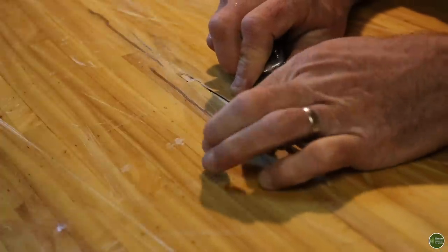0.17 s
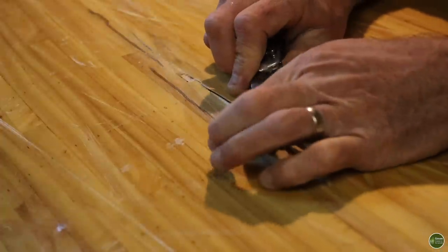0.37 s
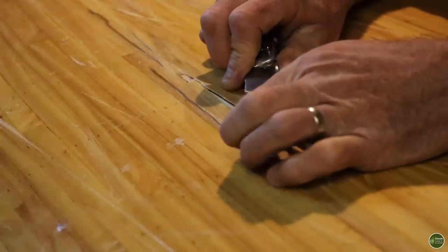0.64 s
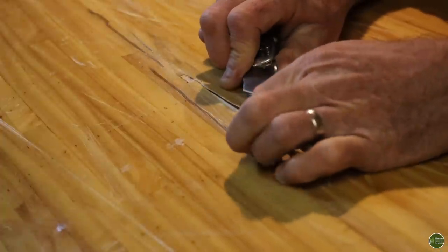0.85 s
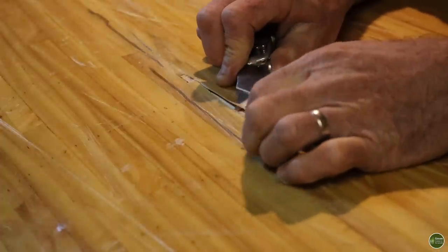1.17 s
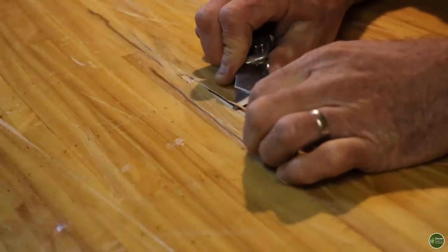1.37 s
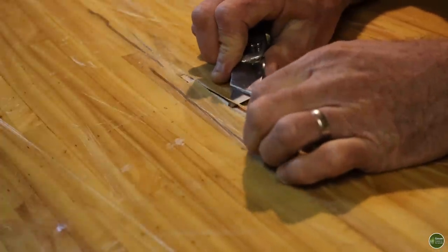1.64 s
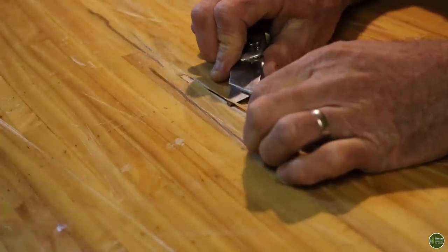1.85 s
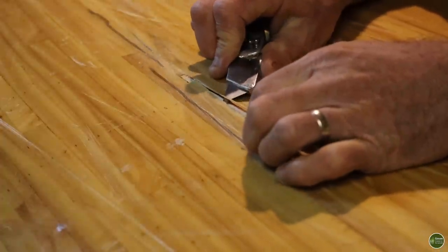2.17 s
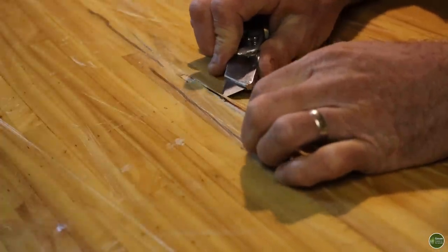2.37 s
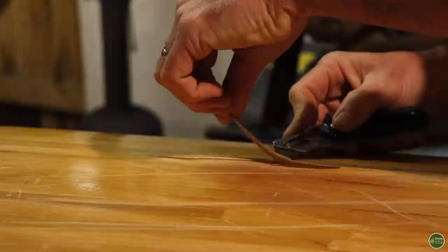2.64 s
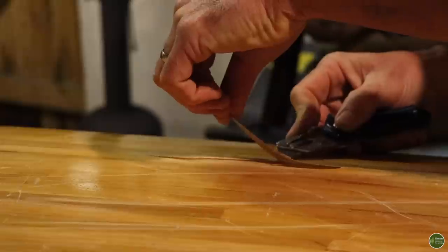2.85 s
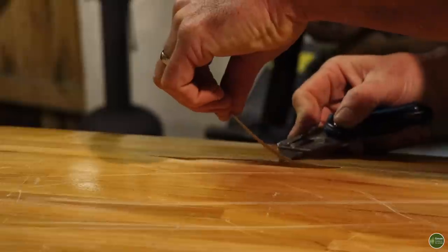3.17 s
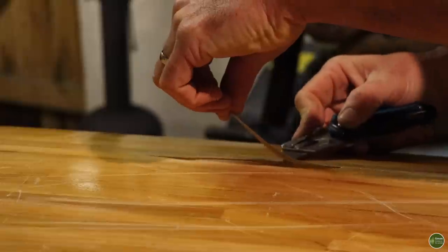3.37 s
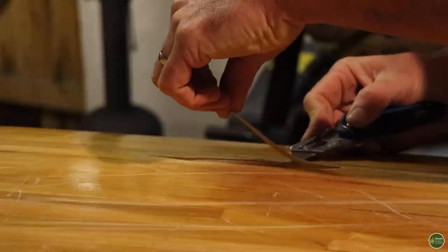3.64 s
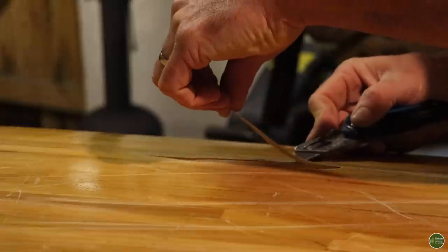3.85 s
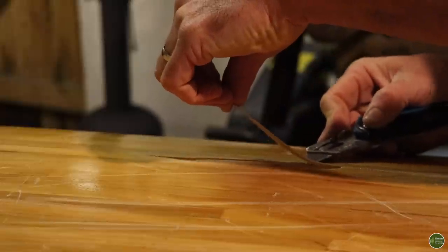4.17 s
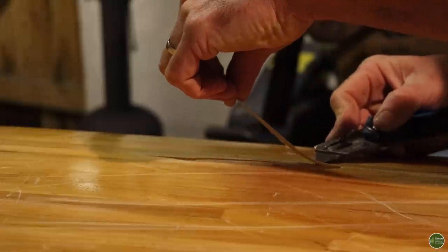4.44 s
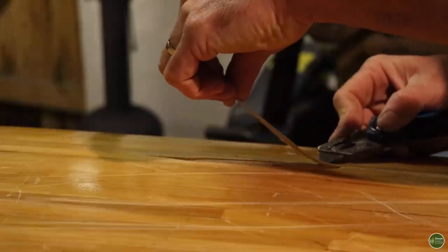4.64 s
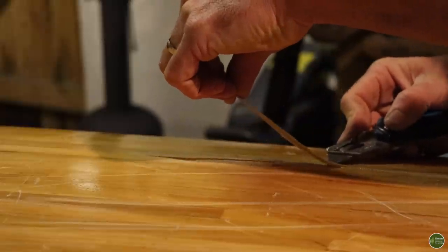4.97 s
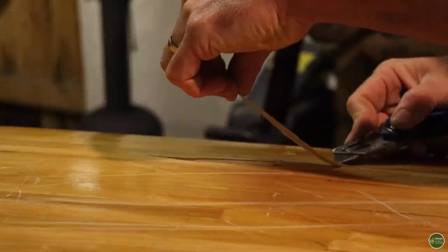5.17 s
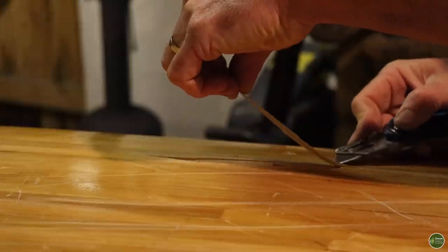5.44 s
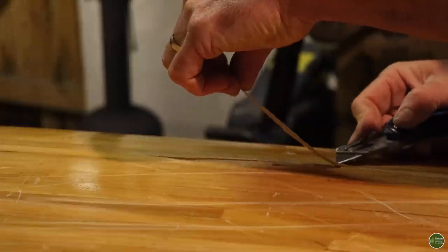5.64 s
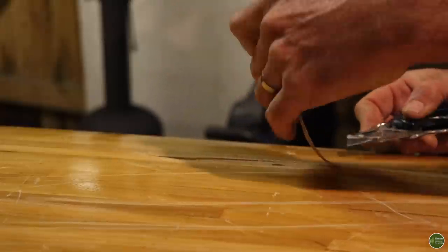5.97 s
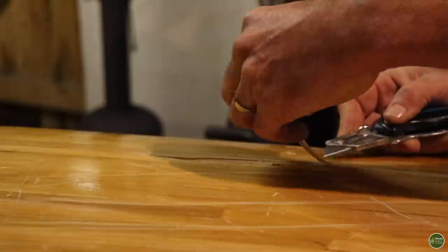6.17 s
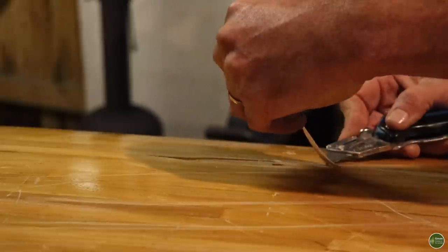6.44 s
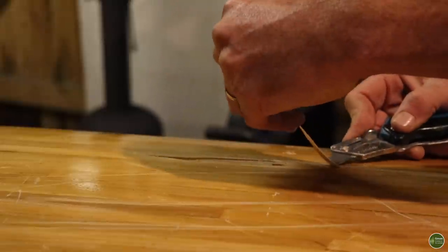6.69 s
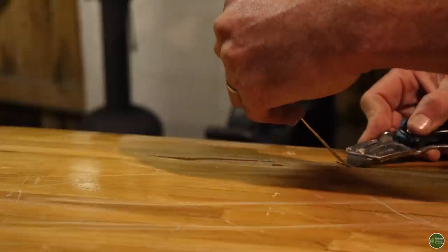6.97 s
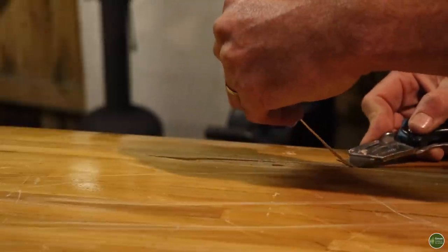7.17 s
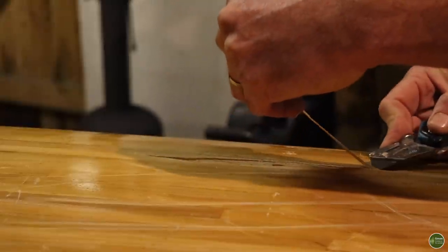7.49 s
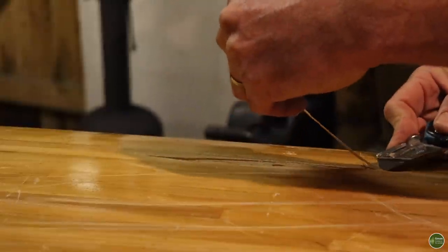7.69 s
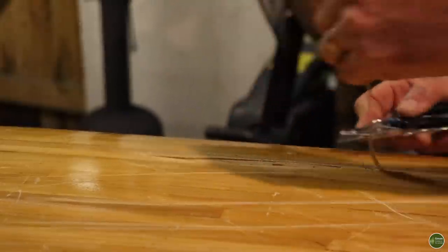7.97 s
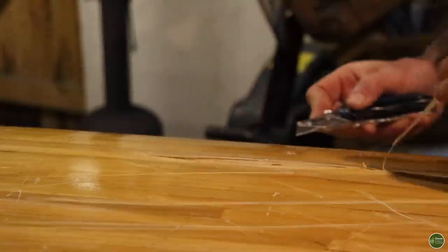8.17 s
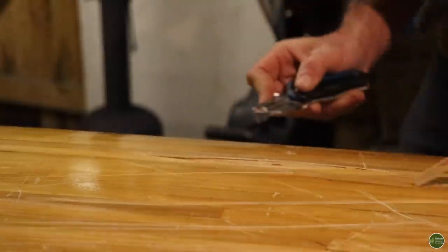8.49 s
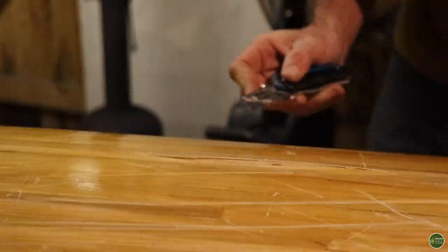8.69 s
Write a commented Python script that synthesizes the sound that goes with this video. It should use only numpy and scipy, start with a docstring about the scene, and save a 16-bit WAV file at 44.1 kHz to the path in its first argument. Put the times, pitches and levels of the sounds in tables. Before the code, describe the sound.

Brittle fibreglass being pried from wood: gritty pushes of a blade, dry clicks, and millisecond-sharp snaps with woody knocks and a short hollow boom. The first part is brighter; after an abrupt change of perspective it is darker and boomier. Pauses are quiet with low garage rumble and slight hiss. Toward the end the snaps become brighter and more frequent, finishing with scrapes and a soft slide. Close microphone, short room reverberation.

```python
"""In a garage, a utility knife pries brittle fibreglass off a wooden hull. Each snap is a millisecond-scale
fracture that rings the strip and blade, knocks on the planking and makes the hollow hull boom. Between snaps
the blade scrapes and the bond tears in dense crackle, made of random grains over friction noise. Now and then a
sleeve or hand brushes softly past, above a low rumble and faint hiss. Part-way through, the sound cuts to a
second listening position."""
import sys
import numpy as np
from scipy import signal
from scipy.fft import rfft, irfft
from scipy.io import wavfile
from scipy.ndimage import uniform_filter1d

SR = 44100
rng = np.random.default_rng(int(sys.argv[2]) if len(sys.argv) > 2 else 0)


def wav_out(sig):
    """Save sig, one row per channel (or a flat mono array), as 16-bit PCM at SR to the path in sys.argv[1]."""
    wavfile.write(sys.argv[1], SR, np.round(np.clip(np.atleast_2d(sig).T, -1, 1) * 32767).astype(np.int16))


N = 388962
TIME = np.arange(N) / SR
IR_SIZE = 32768  # samples in which responses are built
CUT_S = 2.68  # the second listening position takes over
SNAP_SAMPLES = 0.04 * SR  # snap levels are taken over 40 ms


def undb(db):
    """Decibels to gain."""
    return 10 ** (np.asarray(db) / 20)


def unit(x):
    """Scale to an energy of one."""
    return x / np.sqrt(np.sum(x ** 2) + 1e-18)


def rms_one(x):
    """Scale a signal of full length to an rms of one."""
    return unit(x) * np.sqrt(N)


def on_log(hz, points):
    """Read (frequency [Hz], value) points along a log-frequency axis."""
    f, value = np.transpose(points)
    return np.interp(np.log(np.maximum(hz, 1)), np.log(f), value)


def causal(db):
    """Minimum-phase impulse response of a gain curve, by folding its cepstrum."""
    cepstrum = irfft(np.log(undb(db)))
    half = len(cepstrum) // 2
    cepstrum[1:half] *= 2
    cepstrum[half + 1:] = 0
    return irfft(np.exp(rfft(cepstrum)))


def band(x, lo, hi, order=3):
    """Butterworth band-pass between two frequencies in Hz."""
    sos = signal.butter(order, [lo, min(hi, 0.49 * SR)], "band", fs=SR, output="sos")
    return signal.sosfilt(sos, x)


def bumps(hz, modes):
    """Gain in dB of (frequency [Hz], width [Hz], peak [dB]) resonances."""
    return sum(db / (1 + (2 * (hz - f) / width) ** 2) for f, width, db in modes)


def resonate(x, modes, size=2048):
    """Pass a signal through resonances, keeping its length."""
    response = causal(bumps(np.fft.rfftfreq(size, 1 / SR), modes))
    return signal.oaconvolve(x, response)[:len(x)]


def even_out(spectrum, bins):
    """Flatten a spectrum in the large, leaving its fine colour."""
    return spectrum / np.sqrt(uniform_filter1d(abs(spectrum) ** 2, size=bins))


def flutter(size=600):
    """Random unsteadiness over about a hundredth of a second, spread one."""
    smooth = uniform_filter1d(rng.standard_normal(N), size)
    return rms_one(uniform_filter1d(smooth, size // 2))


# spectrum of the garage background: (frequency [Hz], relative density [dB per Hz])
AIR_SPECTRUM = [(15, -25.5), (25, -5.5), (76, -13.5), (229, -17), (335, -26.5), (405, -14.5), (607, -53.5),
                (796, -20.5), (1020, -33), (2610, -37.5), (16000, -45)]
AIR_A_DB, AIR_B_DB = -50.5, -54  # rms level at the first and the second position


def air():
    """Low rumble and faint hiss of the garage: shaped noise, with its level set by the position."""
    gain = undb(on_log(np.fft.rfftfreq(N, 1 / SR), AIR_SPECTRUM))
    noise = irfft(rfft(rng.standard_normal(N)) * gain, N)
    return rms_one(noise) * undb(np.where(TIME < CUT_S, AIR_A_DB, AIR_B_DB))


# ring time of the garage and hull: (frequency [Hz], time to fall by 60 dB [s])
RING_TIMES = [(60, 0.92), (250, 0.22), (1000, 0.25), (3300, 0.26), (7000, 0.19), (14000, 0.12)]


def diffuse(build_s):
    """Dense reflections that build up, then die at a rate that depends on frequency."""
    t, hz = TIME[:IR_SIZE], np.fft.rfftfreq(IR_SIZE, 1 / SR)
    noise, tail = rfft(rng.standard_normal(IR_SIZE)), 0
    build = 1 - np.exp(-t / build_s)
    for (_, t60), pick in zip(RING_TIMES, np.eye(len(RING_TIMES))):
        # each ring time owns the region around its frequency and crossfades into its neighbours
        share = on_log(hz, [(f, p) for (f, _), p in zip(RING_TIMES, pick)])
        tail = tail + irfft(noise * share) * undb(-60 * t / t60)
    # the reflections favour no broad region of pitch
    spectrum = even_out(rfft(tail * build), 45)
    return unit(irfft(spectrum) * build * (t < t[-1] * 0.5))


# modes of the hollow hull: (frequency [Hz], level at first position [dB], level at second position [dB])
HOLLOW_MODES = [(52.5, -9, 2.5), (73.8, -7.5, -2), (111.4, -4, 1.5), (140.16, -0.5, 2.5), (163.8, 4, -29.5),
                (195.7, 0, -14.5), (226.1, 0, -1), (241.5, -3.5, -0.5), (285.4, -0.5, -5),
                (310.6, -5, -9.5), (324.3, -9, -9.5), (355.3, -3, -10), (367, -4.5, -11.5), (411, -4, -18),
                (445.4, -6, -5)]
HULL_T60_S = 0.38


def hull_ring(position, build_s=0.0062):
    """The hull's modes swell as the blow spreads through it, then die away."""
    t, modes = TIME[:IR_SIZE], 0
    for row in HOLLOW_MODES:
        phase = rng.random()
        modes = modes + undb(row[1 + position]) * np.sin(2 * np.pi * (row[0] * t + phase))
    return unit(modes * undb(-60 * t / HULL_T60_S) * (1 - np.exp(-t / build_s)))


# colour of strip, blade and planking at the first and second position: (frequency [Hz], relative gain [dB])
COLOUR_FIRST = [(240, -35.5), (400, 4.5), (1010, -2), (1400, 2), (2050, -3.5), (3370, 0.5), (4950, -7.5),
                (7060, -9.5), (8900, -12.5), (10200, -12), (11400, -15), (12300, -16.5), (13300, -21),
                (14800, -17.5), (16000, -33.5)]
COLOUR_SECOND = [(240, -35), (400, 6.5), (453, 2.5), (504, -6), (645, -2.5), (742, -4), (852, -4),
                 (1160, -6.5), (1900, -9.5), (3310, 0), (4110, -7.5), (5430, -13.5), (7400, -18.5),
                 (12100, -26.5), (16000, -30.5)]
# broad response of the hull at the first and second position: (frequency [Hz], relative gain [dB])
HULL_FIRST = [(35, -22), (70, 4.5), (150, 0.5), (300, 4.5), (500, -1)]
HULL_SECOND = [(28, -6.5), (55, 4.5), (90, -10.5), (140, 0.5), (300, -5.5), (500, -6)]
# resonances of planking, strip and blade: (frequency [Hz], width [Hz], peak over the broad response [dB])
BODY_MODES = [(674, 51, 2), (785, 16, -0.5), (850, 65, 5), (1100, 12, 0), (1076, 26, 1), (1470, 64, -1.5),
              (2647, 230, 3.5), (3020, 43, 3.5), (3420, 270, 1.5)]
# edges of the bands of hull, planking, strip and tick: (frequency [Hz])
PART_EDGES = [24, 500, 2000, 4800, 17000]


def paths(position, boom_build_s=0.011, room_build_s=0.0012, loose_boom_db=-3):
    """Direct and reverberant responses of hull, planking, strip and tick from one spot on the hull."""
    hz = np.fft.rfftfreq(IR_SIZE, 1 / SR)
    colour, hull = [(COLOUR_FIRST, HULL_FIRST), (COLOUR_SECOND, HULL_SECOND)][position]
    thud = unit(band(causal(on_log(hz, hull)), PART_EDGES[0], PART_EDGES[1]))
    loose_boom = unit(signal.fftconvolve(thud, diffuse(boom_build_s))[:IR_SIZE])
    responses = [(thud, unit(hull_ring(position) + undb(loose_boom_db) * loose_boom))]
    click = causal(on_log(hz, colour) + bumps(hz, BODY_MODES))
    garage = diffuse(room_build_s)
    for lo, hi in zip(PART_EDGES[1:], PART_EDGES[2:]):
        direct = unit(band(click, lo, hi))
        responses.append((direct, unit(signal.fftconvolve(direct, garage)[:IR_SIZE])))
    return responses


def sound(force, responses):
    """Each force on a part reaches the ear along its direct and its reverberant path."""
    heard = 0
    for force_pair, response_pair in zip(force, responses):
        for f, response in zip(force_pair, response_pair):
            heard = heard + signal.fftconvolve(f, response[:IR_SIZE // 2])
    return heard


# soft rubs of a sleeve or hand: (peak time [s], rise [s], fall [s], level at the peak [dB])
SLEEVE_RUBS = [(3.22, .012, 0.063, -43.5), (5.849, 0.071, 0.14, -52), (8.785, 0.11, 0.079, -30.5)]


def swish(lo_hz=1150, hi_hz=4400, flutter_db=2):
    """A sleeve or hand brushes past in soft, uneven rubs of band-passed noise."""
    rub = rms_one(band(rng.standard_normal(N), lo_hz, hi_hz) * undb(flutter_db * flutter()))
    level = 0
    for s, rise_s, fall_s, db in SLEEVE_RUBS:
        level = level + np.interp(TIME, [s - rise_s, s, s + fall_s], [0, undb(db), 0])
    return rub * level


# pushes of the blade that scrape and tear the bond: (start [s], length [s], scrape level [dB],
# push on the hull [dB], treble relative to the scrape [dB])
PUSHES = [(0, 0.0069, -31, -24.5, -7), (0.313, 0.11, -44.5, -39.5, -8), (0.469, 0.17, -47.5, -44.5, -5.5),
          (0.737, 0.081, -43.5, -40, -11), (0.93, 0.13, -36, -31, -13.5), (1.183, 0.1, -41.5, -39, -10),
          (1.482, 0.024, -39.5, -43, -8), (1.61, .14, -39, -34.5, -9.5), (1.951, 0.0078, -35, -32, -7),
          (2.094, 0.023, -37, -31, -6.5), (2.268, 0.046, -31, -36, -8), (2.512, 0.1, -30, -33, -12),
          (2.687, 0.15, -53.5, -40.5, -10), (2.888, 0.081, -35, -23.5, -8), (3.086, 0.04, -53, -47, -3.5),
          (3.293, .06, -57, -46, -16), (3.377, 0.17, -45.5, -42, -11), (3.545, 0.032, -35.5, -32, -7.5),
          (3.662, 0.14, -38.5, -35.5, -8.5), (3.954, 0.045, -39, -33.5, -8),
          (4.154, 0.068, -37.5, -31.5, -8), (4.225, .012, -32, -22.5, -13),
          (4.283, 0.014, -32.5, -24.5, -12), (4.392, 0.032, -35, -38, -10), (4.45, 0.3, -47, -36, -11),
          (4.876, .2, -41.5, -36, -10), (4.94, 0.04, -28.5, -22, -10), (5.191, 0.04, -37, -31.5, -11),
          (5.282, .13, -57, -49.5, -7), (5.597, 0.02, -58, -50, -14), (5.815, 0.13, -48.5, -49, -6.5),
          (6.001, 0.19, -54, -41, -4.5), (6.288, 0.034, -49, -38, -6), (6.587, 0.02, -41.5, -37, -13.5),
          (6.775, 0.14, -45.5, -47, -8.5), (6.879, 0.044, -29.5, -20, -6), (7.13, .08, -47, -45, -9),
          (7.22, 0.05, -37, -30.5, -9), (7.303, 0.043, -27, -20, -9), (7.473, 0.034, -44, -55, -6),
          (7.516, 0.082, -40, -27, -1.5), (7.744, 0.12, -44, -42, -5), (7.926, .07, -41, -31, -4),
          (8.05, 0.24, -48, -44, -0.5), (8.342, 0.16, -41, -33, -6), (8.514, 0.14, -39.5, -43, -11.5),
          (8.713, 0.084, -35, -42, -9)]
# blade resting under the strip between pushes: (scrape level [dB], push on the hull [dB], treble level [dB])
RESTING_BLADE = (-63.5, -56, -81)
GRIP_S, EASE_S = 0.028, 0.042  # time to take hold and to ease off
SLOW_GRIP = 0.15  # extra time to take hold, in s per s of the push
# drift over a whole push, ramps included: the scrape grows, the hull takes more weight,
# and the treble falls as the blade sinks in
SWELL_DB, LEAN_DB, DULL_DB = 1.5, 1, -3.5


def strokes():
    """Level of the scrape, of the push on the hull and of the treble: each push grips, holds and eases off."""
    levels = np.outer(undb(RESTING_BLADE), np.ones(N))
    held = np.array([0, 1, 1, 0])
    progress = np.array([-0.5, -0.39, 0.25, 0.5])  # share of the drift at each corner
    for s, length, db, push_db, treble_db in PUSHES:
        corners = [s - GRIP_S - SLOW_GRIP * length, s, s + length, s + length + EASE_S]
        now = slice(*np.searchsorted(TIME, [corners[0], corners[-1]]))
        drifts = [(db, SWELL_DB), (push_db, LEAN_DB), (db + treble_db, DULL_DB)]
        for k, (mean_db, change_db) in enumerate(drifts):
            gain = np.interp(TIME[now], corners, held * undb(mean_db + change_db * progress))
            levels[k, now] = np.hypot(levels[k, now], gain)  # overlapping pushes add in power
    return levels


def splinters(per_s, over_db):
    """Now and then a thicker fibre gives: sparse ticks that stand out of the scrape."""
    ticks = (rng.random(N) < per_s / SR) * rng.uniform(0.5, 1, N)
    return rms_one(ticks) * undb(over_db)


def scraping(grains_per_s=800, spread_db=5, rub=0.54, flutter_db=3.0, knock_db=-5.5, hull_share=0.57,
             direct_db=-1, hull_direct_db=-10):
    """Fibres let go in dense uneven grains over the rub of the blade; harder pushing shakes planks and hull."""
    level, push, treble = strokes()
    sizes = undb(spread_db * np.minimum(rng.exponential(size=N), 3))
    grains = (rng.random(N) < grains_per_s / SR) * sizes * rng.choice([-1, 1], N)
    crackle = unit(grains) + rub * unit(rng.standard_normal(N))
    # the blade sticks and slips, so the friction comes in patches
    friction = rms_one(crackle * undb(flutter_db * flutter()))
    friction = friction + splinters(per_s=15, over_db=-9)
    knock = undb(knock_db) * level * (0.5 + push / level) ** hull_share
    # hull, planking, strip, tick: (level over time, direct over room [dB])
    parts = [(push, hull_direct_db), (knock, direct_db), (level, direct_db), (treble, direct_db)]
    force = []
    for gain, near_db in parts:
        split = unit(np.array([undb(near_db), 1]))
        force.append(np.outer(split, friction * gain))
    return np.array(force)


def crack(decay_s, resonance, lead_db, lead_s=0.0027, size=1024):
    """One fracture: fibres give just before the main break and smaller breaks run on after it."""
    t = TIME[:size] - TIME[size // 2]
    lead_in = undb(lead_db) * np.exp(-abs(t) / lead_s)
    shape = np.where(t < 0, lead_in, np.exp(-abs(t) / decay_s))
    # each crack keeps a little fine colour but is even in the large
    spectrum = even_out(rfft(rng.standard_normal(size) * shape), 15)
    return unit(resonate(irfft(spectrum), [resonance]))


# very high spit at the start of the hardest snap: (time [s], frequency [Hz], width [Hz], peak [dB])
HIGH_SPIT = (2.5188, 12300, 1200, 18)
SPIT_DB = -22.5


def spit(decay_s=0.0012):
    """A millisecond of very fine splintering, brightest in the top octave."""
    s, *resonance = HIGH_SPIT
    burst = crack(decay_s, resonance, -40)
    start = int(s * SR) - len(burst) // 2
    placed = np.pad(burst, (start, N - start - len(burst)))
    return placed * undb(SPIT_DB) * np.sqrt(SNAP_SAMPLES)


# snaps of resin and clicks of the blade: (time [s], level of the strip's part over 40 ms [dB],
# hull boom relative to it [dB], brightness [dB], direct over room before each part's offset [dB],
# pitch of the knock [Hz], pitch of the strip's ring [Hz])
RESIN_SNAPS = [(0.038, -40.5, 0, -3.5, -4, 1560, 2800), (0.7485, -29, -5, -1, -1, 1390, 3300),
               (0.9328, -33, 6, -2.5, -5.5, 1470, 3450), (0.952, -38.5, -10, 0.5, 9, 1440, 3500),
               (1.0313, -29, 1.5, -1, -3, 1320, 2800), (1.1977, -37, 10.5, -1, -5, 1370, 3250),
               (1.239, -32.5, -17, 0.5, -2, 1650, 6700), (1.4498, -37, 7.5, -2.5, -3, 1620, 3250),
               (1.4931, -37.5, 2, -3.5, 4, 1150, 3220), (1.5991, -39.5, 16, -5, -6, 1830, 3250),
               (1.6368, -26, -15, -2.5, -0.5, 1070, 3400), (1.752, -45, 1, -3.5, -2, 1530, 3410),
               (1.855, -44.5, 7.5, -4, -5, 1530, 3140), (2.1115, -29, -2.5, -1, 2, 1650, 6110),
               (2.273, -42, 8, -5, -3, 1530, 6910), (2.2951, -33.5, -1, 1, 9, 1640, 6800),
               (2.5183, -18.5, -1.5, 2.5, 10.5, 1540, 7140), (2.531, -24, -12, -1, -4, 894, 3430),
               (2.625, -35.5, 0, 7.5, 3, 1530, 6030), (2.784, -47.5, -2, 0.5, -6, 825, 5100),
               (2.9014, -37, 7.5, 0.5, 2, 640, 3100), (2.9139, -30.5, 15.5, -3, -3.5, 640, 3030),
               (2.9434, -30, 9.5, -1, 1, 845, 2980), (3.509, -41, 8, -1.5, -3, 840, 4500),
               (3.572, -46.5, 10, 2, 7, 830, 3100), (3.681, -45, 0, -1.5, 8, 820, 5820),
               (3.759, -37.5, 4, 1, -1, 824, 5600), (4.2052, -23.5, 5, 0, -1.5, 804, 6800),
               (4.272, -32, 9.5, -2.5, 7.5, 850, 3870), (4.4904, -39.5, 8.5, -2, -7, 625, 2600),
               (4.516, -43.5, -4, 1, 0, 820, 3670), (4.6861, -29.5, 6.5, -1.5, -2, 870, 2580),
               (4.9202, -26.5, 2.5, -0.5, 1, 804, 6400), (4.9486, -28.5, 4.5, 0, -3, 850, 6580),
               (4.974, -36, -6, 2, 13, 826, 3770), (5.1862, -29, 2, 0.5, -1, 845, 3870),
               (5.213, -36.5, 4.5, 0.5, -0.5, 860, 3780), (5.3391, -49.5, 15, -3.5, 1.5, 813, 3040),
               (5.741, -50.5, 9.5, 0, -4, 823, 5740), (5.997, -54.5, 16.5, -6, 1, 676, 5930),
               (6.0157, -53, 8, 5.5, 7, 1280, 5900), (6.2817, -53.5, -8, -3, -10, 677, 6070),
               (6.3098, -55, -9.5, 6.5, 7, 800, 5950), (6.8667, -29, 1.5, -1.5, -3.5, 830, 3940),
               (6.882, -32.5, -5, 6, -2, 855, 5270), (6.912, -32.5, 8, -1, 13, 860, 5300),
               (7.2123, -38, -17, 0.5, 3.5, 840, 5930), (7.243, -44, 3, 2, 12, 1630, 5910),
               (7.2925, -27.5, 6.5, 0, -8, 670, 5560), (7.309, -28, 5, -0.5, -3, 704, 5470),
               (7.322, -33, 7, 4, 3.5, 850, 5500), (7.5095, -39.5, -9, -1.5, 3.5, 634, 3360),
               (7.5677, -24, -20, 2, 3.5, 1015, 3300), (7.6592, -25.5, -9, 2, 2.5, 960, 3240),
               (7.695, -28, 0.5, 1.5, 0.5, 930, 5660), (7.7922, -39, -6, .5, -2.5, 746, 3410),
               (7.9337, -38, 15, -1.5, 2.5, 567, 3300), (8.0226, -38.5, -15, 3.5, -0.5, 1550, 3490),
               (8.071, -44.5, -3, 6, -6, 1510, 6640), (8.152, -24, -11, 1, 2, 850, 3650),
               (8.228, -42, -12, 1, 3, 860, 3500), (8.3237, -23, -0.5, 3.5, -2, 1590, 5340),
               (8.4405, -43.5, -15, 8.5, 0, 1900, 3660), (8.4615, -32, -17, 0, 4, 1930, 3620),
               (8.493, -28.5, 8.5, 0, -5, 1620, 3680)]


def snaps(knock_s=0.0024, ring_s=0.0032, tick_s=0.0012, hull_direct_db=-11, knock_direct_db=-4,
          tick_direct_db=5.5, knock_width_hz=200, knock_peak_db=7, ring_width_hz=650, ring_peak_db=4.5,
          lead_db=-18, knock_db=-0.72, tick_db=-2.0, knock_purity=1.2, ring_purity=0.7):
    """Each break strikes hull, planking, strip and tick, split into direct and room sound."""
    force = np.zeros((4, 2, N + IR_SIZE))
    for s, db, boom, bright_db, direct_db, knock_hz, ring_hz in RESIN_SNAPS:
        # a bright snap is more tick and less knock
        knock, tick = knock_db - bright_db, tick_db + bright_db
        # a clean break in the open starts more abruptly and rings more purely than a buried, ragged one
        clean_db = np.clip(direct_db, 0, 5)
        lead = lead_db - 2 * clean_db
        plank = (knock_hz, knock_width_hz, knock_peak_db + knock_purity * clean_db)
        strip = (ring_hz, ring_width_hz, ring_peak_db + ring_purity * clean_db)
        # (shape of the force, level relative to the strip [dB], offset of direct over room [dB])
        parts = [(np.ones(1), boom, hull_direct_db),
                 (crack(knock_s, plank, lead), knock, knock_direct_db),
                 (crack(ring_s, strip, lead), 0, 0),
                 (crack(tick_s, strip, lead), tick, tick_direct_db)]
        for k, (shape, rel_db, near_db) in enumerate(parts):
            start = int(s * SR) - len(shape) // 2
            split = unit(np.array([undb(direct_db + near_db), 1]))
            blow = np.outer(split, shape) * undb(db + rel_db) * np.sqrt(SNAP_SAMPLES)
            force[k, :, start:start + len(shape)] += blow
    return force[:, :, :N]


# resonances of the taut strip rasping under the blade: (frequency [Hz], width [Hz], peak [dB])
RASP_MODES = [(2900, 1800, -3), (3630, 230, 1.5), (4900, 450, -3), (5570, 1500, 5)]
# how taut the strip is: (time [s], share [0-1])
TAUTNESS = [(2.7, 0.11), (3.3, 0.45), (5.6, .3), (6.0, 0.56), (6.7, 1), (7.36, 1), (7.55, 0.04)]


def tighten(force):
    """Pulling the strip taut brings out its rasp in the two upper parts."""
    taut = np.clip(np.interp(TIME, *np.transpose(TAUTNESS)), 0, 1)
    upper = [[(1 - taut) * f + taut * resonate(f, RASP_MODES) for f in pair] for pair in force[2:]]
    return np.concatenate([force[:2], upper])


# pauses after which the blade bites at a new spot: (time [s])
NEW_SPOTS = [.9, 1.42, 2.47, 4.1, 4.85, 6.7, 7.63, 8.3]


def scene():
    """The work moves from spot to spot, heard from one position and then another; the cut chops off ringing."""
    force = tighten(snaps() + scraping())
    out = air() + swish() + spit()
    cut = int(CUT_S * SR)
    bounds = sorted([0, cut, N] + [int(s * SR) for s in NEW_SPOTS])
    for start, stop in zip(bounds, bounds[1:]):
        position = int(start >= cut)
        end = N if position else cut
        # fresh reflections and hull phases for each spot
        work = sound(force[:, :, start:stop], paths(position))[:end - start]
        out[start:start + len(work)] += work
    return out[None]


TOP_HZ = 15850


def record(dry):
    """Overload clips any peaks beyond full scale, then a steep low-pass cuts the top."""
    low_pass = signal.ellip(8, 0.2, 70, TOP_HZ, fs=SR, output="sos")
    return signal.sosfilt(low_pass, np.clip(dry, -1, 1))


dry = scene()
out = record(dry)
wav_out(out)
```